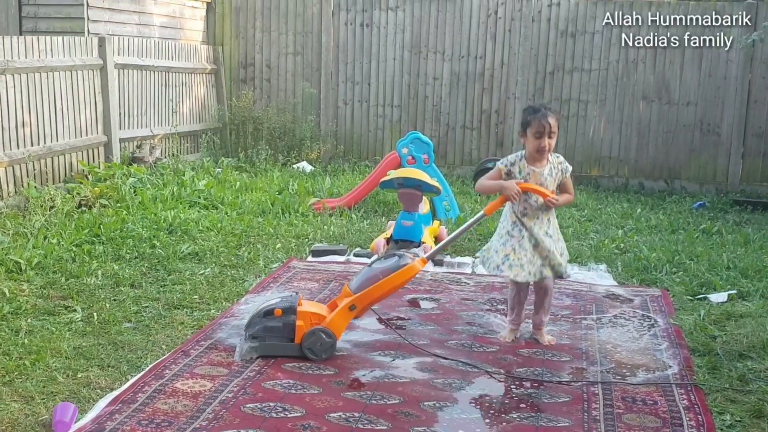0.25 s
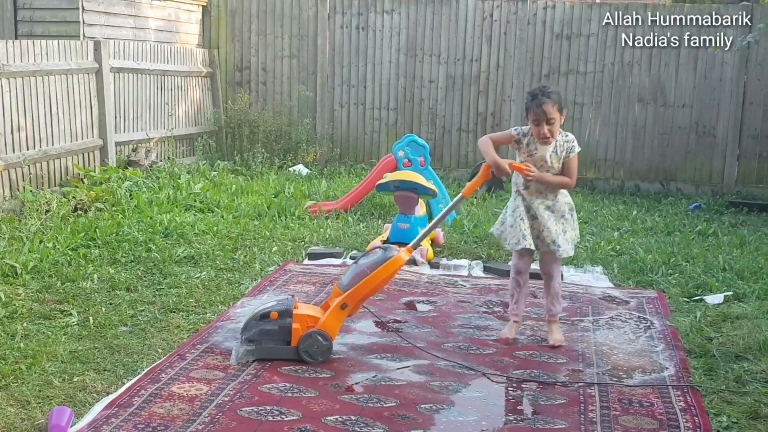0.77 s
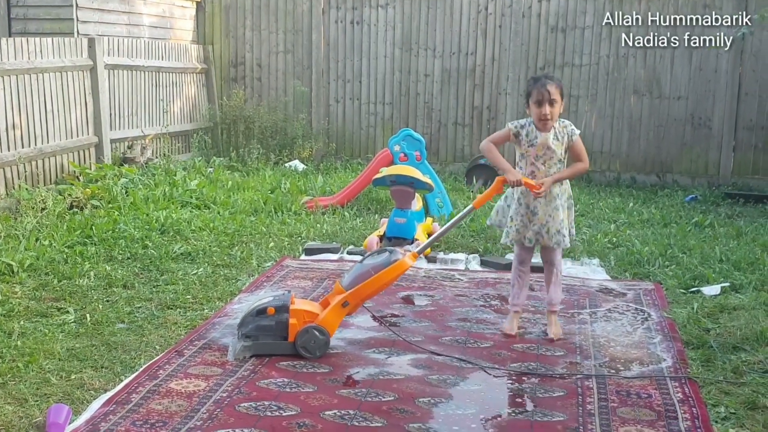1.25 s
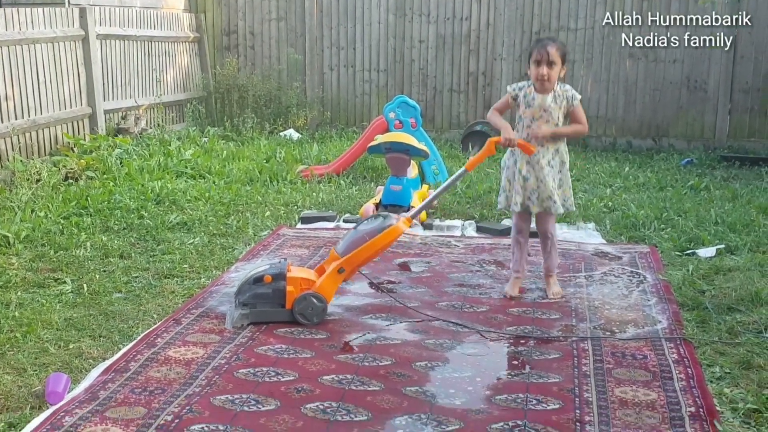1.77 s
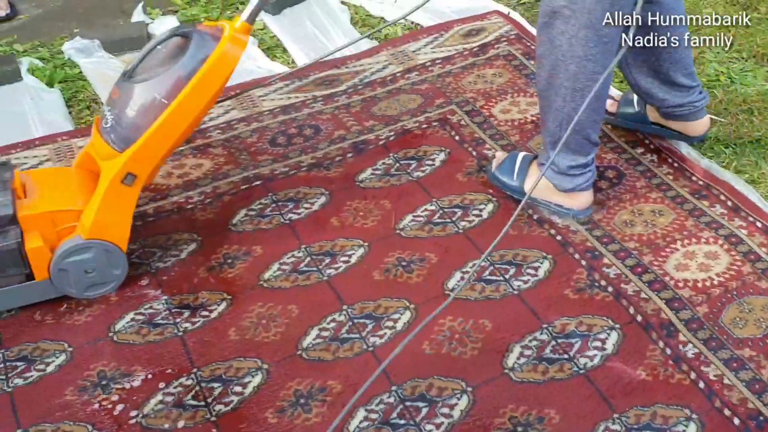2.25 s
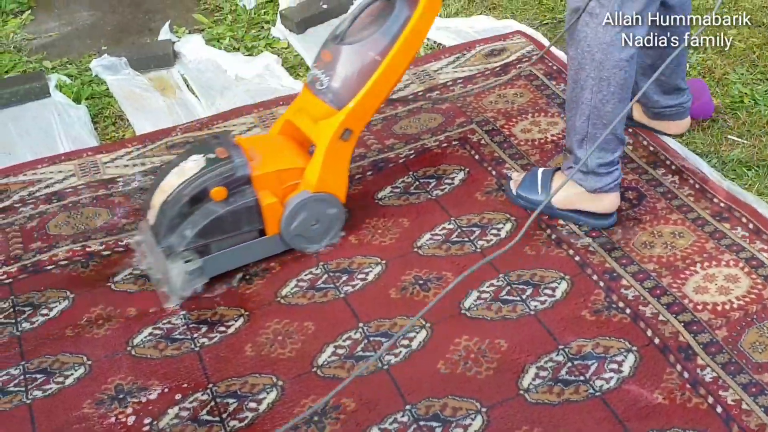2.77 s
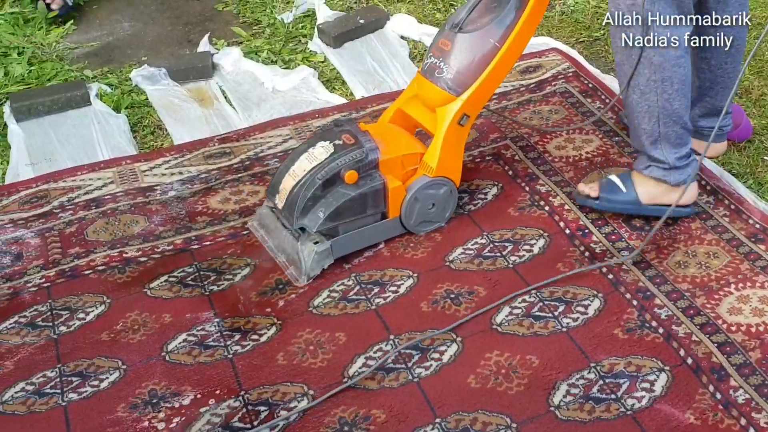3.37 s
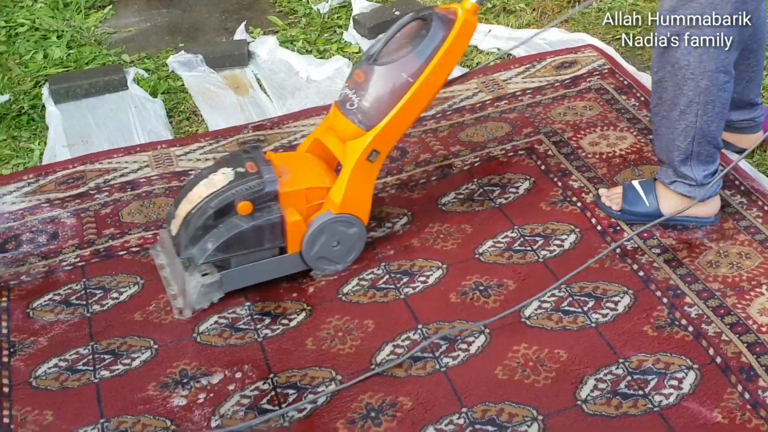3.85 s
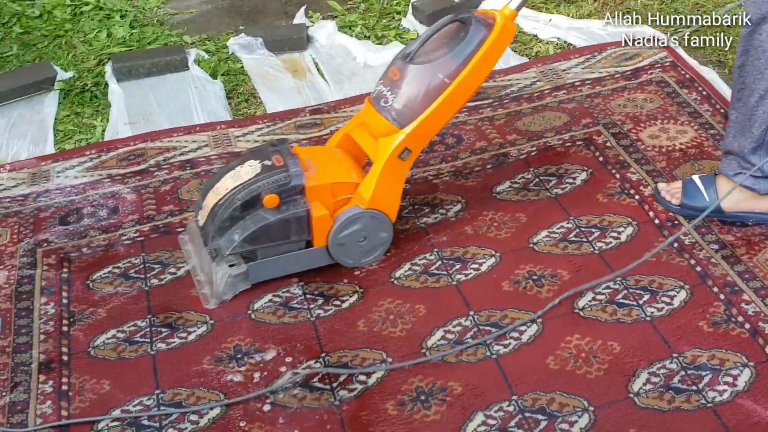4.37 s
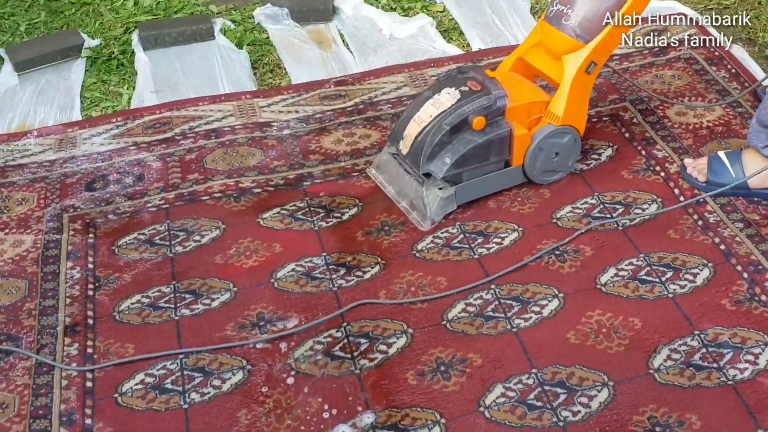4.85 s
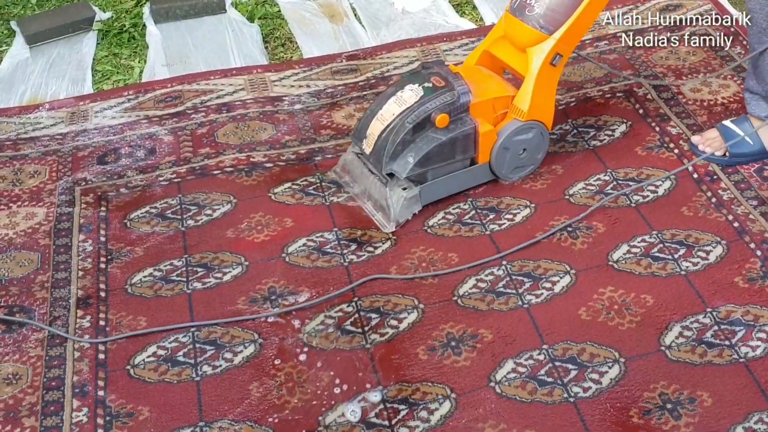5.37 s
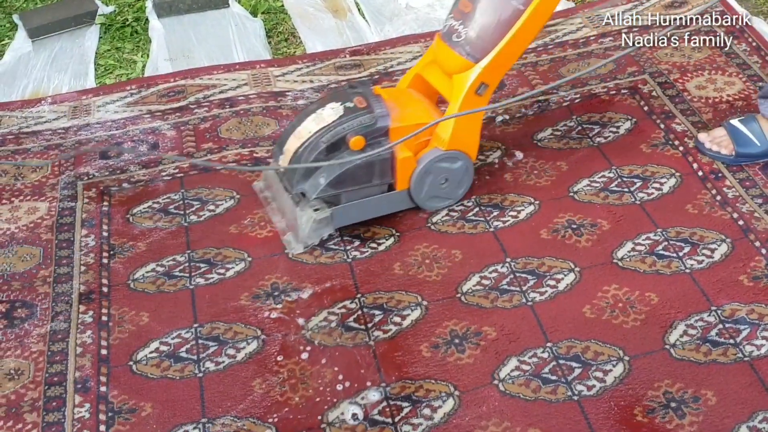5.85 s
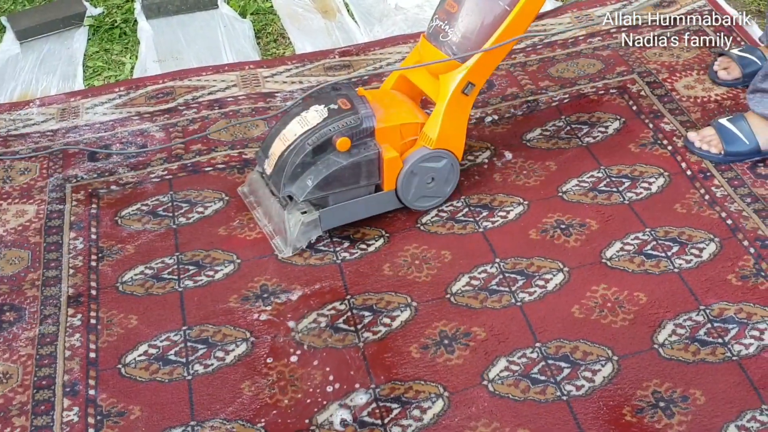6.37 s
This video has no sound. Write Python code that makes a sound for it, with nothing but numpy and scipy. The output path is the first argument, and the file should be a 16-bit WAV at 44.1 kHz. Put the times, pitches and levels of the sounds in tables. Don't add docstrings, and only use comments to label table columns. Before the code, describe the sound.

An upright carpet washer is already running at full speed on a wet rug in a fenced yard, captured in stereo by a phone. From 0 to about 2.6 seconds it is a few metres away: a strong, nearly constant motor tone around 450 hertz, faint higher multiples including a wavering whine near 3 kilohertz, and a broad, slightly hollow suction hiss. At about 2.6 seconds an abrupt cut moves close. The pitch stays almost the same, but the air is louder and the whine more piercing. The hum dips deeply around 3.1 seconds, returns strongly near 3.9, sinks again about 4.9, and recovers by 5.9, shifting a little between the sides. Suction surges with short strokes, notably around 3.2, 3.9 and 4.6 seconds, and slight low wind puffs stir beneath. The machine is still running at 6.6 seconds.

```python
import sys
import numpy as np
from scipy import signal
from scipy.fft import rfft, irfft, next_fast_len
from scipy.io import wavfile
from scipy.ndimage import uniform_filter1d, map_coordinates

SR = 44100
rng = np.random.default_rng(int(sys.argv[2]) if len(sys.argv) > 2 else 0)


def file_out(sig):
    cols = np.atleast_2d(sig).T
    lim = np.clip(cols, -1, 1)
    pcm = np.round(lim * 32767).astype(np.int16)
    wavfile.write(sys.argv[1], SR, pcm)


def attenuation_scalar(level_db):
    decades = np.asarray(level_db, float) / 20
    return 10 ** decades


N = 291942
CUT_S, CUT_TURNS = 2.56667, -0.5
CONTROL_HOP = 32
SHAFT_USUAL_DB = -30
DRIFT_DB, DRIFT_PER_S = 0.5, 8.36
PATCH_OCTAVES = 0.43

# (time [s], speed [turns/s])
SHAFT_SPEED = [(0, 451.2), (.7, 451.0), (1.6, 451.1), (2.2, 451.2), (2.566, 451.1), (2.567, 450.0),
               (3.7, 450.1), (3.95, 450.3), (4.15, 449.9), (4.6, 449.4), (5.05, 450.0), (5.7, 449.9),
               (6.15, 449.4), (6.62, 449.3)]
# (time [s], level [dB], left-right [dB])
SHAFT_LEVEL = [
    [(0, -29, -.3), (.15, -29.5, 0), (.28, -30.5, -1), (.5, -31, 2), (.68, -29.5, -1), (1.14, -31, -2.5),
     (1.72, -29, -2), (2.57, -30.5, -2)],
    [(2.57, -28.5, -1), (2.82, -31, 3), (3.1, -39, 4), (3.26, -36, 4), (3.66, -34, 4.5), (3.88, -27.5, 2),
     (4.35, -28.5, -1.5), (4.56, -28.5, 1.5), (4.69, -29, 7), (4.9, -36.5, 10), (5.08, -32.5, 6),
     (5.32, -31, 7), (5.9, -27.5, 3), (6.62, -29.5, 1)],
]
# (multiple, far [dB], near [dB], share of shaft swing [dB/dB])
STRONG = [(2, -53.5, -54, 0.27), (3, -57, -46.5, 0.46), (5, -63.5, -51.5, -0.5), (6, -61, -52, 0.39),
          (12, -63.5, -62.5, -0.25)]
PORT_LEAN = [(2, .1, -.76, -.08, -.35), (3, -.3, -.7, -.1, -.33), (5, -.15, 0, -.12, -.15),
             (6, -.13, .17, -.24, .05), (12, -.2, -.5, -.05, .1)]
# (multiple, far [dB], near [dB])
WEAK = [(4, -57, -61), (8, -66, -61.5), (9, -71, -64.5), (10, -75, -74), (11, -75, -77), (13, -70, -70),
        (14, -67, -72), (15, -78, -76), (16, -77, -75), (18, -80, -84), (20, -80, -84), (22, -79, -74),
        (23, -79, -76), (24, -75.5, -78), (28, -85, -86)]
# (time [s], multiple, length [s], level [dB])
ALIGNED = [(1.4, 2, 0.27, 2), (1.73, 2, 0.12, -16), (2.32, 2, 0.46, -6), (2.73, 2, 0.29, 9.5),
           (3.46, 2, 0.14, -11), (3.87, 2, 0.14, 6.5), (5.3, 2, 0.2, 6), (5.26, 2, 0.4, -4),
           (.05, 3, .2, -5), (1.48, 3, 0.14, 4.5), (3.24, 3, 0.25, -8.5), (3.7, 3, 0.45, 1.5),
           (4.6, 3, 0.67, -5.5), (5.6, 3, 0.042, 7), (2.63, 5, 0.18, -18), (4.1, 5, 0.1, 2),
           (5.4, 5, 0.13, 3), (5.9, 5, 0.17, 3.5), (0.73, 6, 0.84, 5), (4.3, 6, 0.29, 5),
           (5.45, 6, 0.59, -11), (6.55, 6, 0.55, 5.5), (1.67, 12, 0.24, -8), (2.7, 12, 0.16, -12),
           (2.25, 12, 0.08, 5.5), (2.7, 12, 0.12, 3), (3.59, 12, 0.052, 12), (3.7, 12, .12, -2),
           (5.24, 12, 0.18, -16), (5.6, 12, 0.045, 9), (4.2, 2, 0.14, -6), (4.1, 2, 0.37, 2.5),
           (6.45, 2, 0.29, 2.5), (2.62, 3, 0.41, -3), (6.55, 5, .2, 2.5), (2.6, 6, .12, -6),
           (5.95, 6, .25, -1.5), (5.1, 6, 0.13, -9), (1.9, 4, 0.28, -0.5), (3.95, 4, .12, 11),
           (2.0, 8, .5, -6), (6.1, 8, 0.41, -1), (1.33, 3, 0.066, -8), (2.6, 3, .2, 0.5), (2.6, 3, .08, 2),
           (1.94, 12, 0.25, 5), (4.35, 12, .06, 8)]
# (time [s], multiple, length [s], level [dB])
FLICKERS = [(5.2, 12, .06, 7), (2.7, 12, .1, 6.5), (6.45, 12, .14, -6), (6.12, 12, .1, 4),
            (.03, 12, .2, -6), (2.92, 12, 0.074, 3), (1.28, 12, .15, 4), (6.55, 3, .08, -6),
            (4.88, 2, 0.076, -10), (5.14, 2, .05, -8), (2.37, 2, .05, -8), (6.58, 2, .1, 4),
            (3.2, 2, .08, 3), (3.2, 2, .1, -6), (0.12, 2, 0.28, 2), (3.6, 5, .08, 5), (4.3, 5, .15, -3),
            (4.8, 5, .07, 4), (3.66, 5, 0.055, -8), (4.9, 5, .05, -6), (4.9, 5, .3, 1.5)]
# (far [dB], near [dB])
BLADE_MID_DB = [-56.5, -51.5]
BLADE_SIDE_DB = [-52.5, -52]
# (time [s], length [s], mid peak [dB], side peak [dB])
BLADE_SWELLS = [(0.547, 0.16, -76, -48), (1.288, 0.07, -56, -70), (1.27, .25, -66, -51), (.9, .2, -77, -60),
                (1.554, .2, -64, -50), (1.774, 0.22, -49, -64), (1.994, 0.091, -57, -51),
                (2.215, 0.27, -46.5, -55), (2.453, 0.33, -47.5, -49), (2.556, .04, -50, -48),
                (2.593, 0.04, -47, -31), (2.64, .07, -80, -41), (2.69, 0.037, -48, -57),
                (2.805, 0.09, -49, -62), (0.048, .08, -62, -60), (.22, 0.065, -54, -75),
                (.38, .08, -57, -60), (0.51, .1, -57, -58), (.83, 0.089, -63, -62), (3.752, .05, -54, -60),
                (3.872, 0.064, -55, -55), (6.3, 0.17, -53, -64), (2.916, 0.07, -40, -35),
                (3.37, .08, -80, -50), (3.63, .08, -80, -48), (3.95, .08, -80, -48), (5.22, .1, -77, -47),
                (4.92, .25, -77, -56), (3.016, 0.1, -37.5, -49), (3.153, 0.15, -49, -41),
                (3.474, 0.33, -39.5, -62), (4.084, 0.13, -71, -42), (4.285, 0.14, -61, -48),
                (4.558, 0.11, -42.5, -54), (4.74, 0.12, -40, -47), (4.9, 0.44, -40.5, -56),
                (5.475, 0.3, -36.5, -48), (5.652, 0.22, -50.5, -41.5), (5.88, 0.17, -46, -64),
                (6.09, 0.4, -40.5, -62), (6.598, 0.46, -38.5, -58)]
# (time [s], length [s], level [dB])
BLADE_GAPS = [
    (2.575, 0.012, -18),
    (2.64, .025, -12),
    (2.72, .04, -5),
    (.74, .06, -10),
    (3.8, .03, -7),
    (4.4, .04, 4),
    (.32, .07, -4),
    (0.082, .05, -3),
    (3.27, .05, -4),
    (3.11, .05, -3),
]
# (far [dB], near [dB])
AIR_DB = [-42, -39]
# (far [dB], near [dB])
AIR_PAN_DB = [-2.1, -2]
AIR_LAYER_HZ = [1100, 1800, 4200, 8000]
AIR_FOLLOWS_SHAFT = [0.39, 0.002, -0.094, -0.063]
AIR_FOLLOWS_SUCTION = [.05, 0.23, 0.24, 0.47]
# (time [s], suction [dB])
SUCTION = [
    [(0, -2.5), (.25, 2), (.55, 0), (.9, -1.5), (1.6, -1.5), (2.25, -2.5), (2.57, 0)],
    [(2.57, 6), (2.65, 2), (2.8, -2.5), (3.0, 1.5), (3.2, 5.5), (3.6, 0.5), (3.9, 5), (4.3, 1.5),
     (4.55, 6.5), (4.7, 6.5), (4.8, 3), (5.3, 1.5), (5.65, 1), (5.78, 0.5), (5.9, 4.5), (6.15, 3),
     (6.3, 3.5), (6.62, 2.5)],
]
# (frequency [Hz], density [dB])
FAR_COLOUR = [(20, -20), (100, -11.5), (230, -1.5), (420, 0), (590, -2), (900, -3.5), (1250, -11.5),
              (2000, -4), (3000, -9.5), (4800, -11.5), (9500, -16.5), (11500, -29), (13500, -28.5),
              (15500, -43)]
NEAR_COLOUR = [(20, -30), (100, -19), (200, -7), (320, 1.5), (600, -2), (1050, -6.5), (1250, -3.5),
               (1850, -1), (3000, -5.5), (4200, -10), (5300, -17.5), (9000, -18), (10600, -24.5),
               (11400, -34), (15500, -46.5)]
# (frequency [Hz], width [Hz], level [dB])
FAR_DUCTS = [(236, 20, -3.5), (303.5, 38, 9.5), (593, 41, -5), (3020, 130, -7.5), (1040, 210, 6.5),
             (1640, 180, 8), (1915, 57, 10), (2216, 88, 7), (2580, 230, 13), (4340, 150, 7.5),
             (7550, 180, 5.5), (3265, 470, 9.5), (1240, 110, -5), (6090, 60, 2), (11800, 200, 8),
             (13700, 600, -5), (4020, 68, 5), (4750, 150, -2), (1390, 40, -3)]
NEAR_DUCTS = [(1830, 120, -8.5), (3070, 170, -3), (477, 92, -7.5), (1308, 45, 9), (1452, 145, 5.5),
              (1624, 69, 4.5), (2090, 330, 2.5), (2540, 230, 5), (6050, 145, 9.5), (7520, 140, 3.5),
              (11600, 500, -2.5), (12000, 130, 6), (13150, 200, 2), (13650, 450, -2), (385, 42, -3),
              (5740, 120, -1), (4040, 120, 3.5), (3520, 92, 1.5)]
# (frequency [Hz], level re direct air [dB])
FAR_SCATTER = [(40, -6), (110, -7), (250, -16), (600, -8), (1050, 0.5), (1280, 9.5), (1600, 1),
               (2400, -6.5), (3000, -4), (4200, -6.5), (7000, -1.5), (9200, 4.5), (12500, 5.5), (15000, 12)]
NEAR_SCATTER = [(40, -14), (110, -17), (250, -14), (600, -9), (1050, -2), (1500, -4.5), (3000, -3),
                (4200, -1.5), (5500, -0.5), (8500, 0.5), (15000, 16.5)]
# (delay [ms], share [ratio])
FAR_PORTS = [(.19, -0.2), (.55, -0.18), (1.15, -0.12)]
NEAR_PORTS = [(0.181, -0.55), (.62, 0.14)]
# (time [s], left port delay [ms])
LEFT_LATE = [(0, -.04), (2.56, -.05), (2.58, -.09), (3.1, .01), (3.7, 0), (4.1, -.06), (4.5, 0), (4.9, .05),
             (5.5, .02), (6.62, 0)]
# (time [s], length [s], level [dB])
TOP_SWELLS = [
    (2.7, .3, 2),
    (3.02, .1, -3),
    (3.36, .08, -2),
    (4.1, 0.32, 3),
    (4.35, .17, 5),
    (5.5, .3, -1),
    (6.0, 0.16, 3),
]
# (time [s], length [s], level [dB])
BREEZE = [
    (.36, .1, 14),
    (1.9, .15, -5),
    (2.35, .2, -5),
    (3.104, .2, 9),
    (3.5, .08, 4),
    (3.9, .15, 7),
    (4.4, .2, 8),
    (5.1, .1, -1),
    (6.6, .12, 9),
]
# (time [s], length [s], frequency [Hz], level [dB])
AIR_PATCHES = [(1.65, 0.48, 940, -4), (2.7, 0.32, 1000, 4.5), (3.04, .25, 1200, -2), (4.2, .7, 1150, 2.5),
               (5.5, .8, 1120, -3), (6.1, .5, 1100, 2), (3.85, .25, 2000, -1), (6.45, .4, 2300, 3.5),
               (2.62, 0.21, 2200, -6), (3, 0.28, 2600, -2), (5.85, 0.49, 2500, 3.5), (1.05, .3, 4500, 3.5),
               (2.75, 0.35, 3600, -6.5), (4.07, .5, 4300, -3), (5.05, 0.55, 4100, 2.5),
               (4.9, .5, 6500, -2.5), (2.72, .3, 9600, 4), (3.85, 0.28, 9000, -4.5), (4.54, .4, 9000, -3.5),
               (5.0, .35, 5650, 0), (5.06, .3, 6600, -0.5), (3.23, .3, 8100, 0.5), (2.9, 0.36, 5600, -1),
               (5.36, .45, 7900, -1.5), (3, .3, 9000, -1), (6.3, .15, 4600, -1), (2.2, .25, 530, -6),
               (3.15, 0.39, 740, 4), (3.66, .25, 890, -1), (3.9, .7, 2100, -1), (5.6, 0.25, 2000, -1),
               (6.6, .7, 4030, 1)]


def on_log(hz, points):
    at_hz, value = np.transpose(points)
    return np.interp(np.log(hz), np.log(at_hz), value)


def columns(table, t):
    at_s, *rest = np.transpose(table)
    return [np.interp(t, at_s, column) for column in rest]


def walk(rate_hz, slow):
    hold = max(int(SR / CONTROL_HOP / rate_hz), 1)
    held = np.repeat(rng.standard_normal(len(slow) // hold + 1), hold)
    return 1.62 * uniform_filter1d(uniform_filter1d(held, hold), hold)[:len(slow)]


def bump(x, centre, length):
    return np.exp(-4 * ((x - centre) / length) ** 2)


def events_db(t, events):
    return sum(db * bump(t, at_s, length_s) for at_s, length_s, db in events)


def multiple_db(t, multiple, table):
    return events_db(t, [(at_s, length_s, db) for at_s, of, length_s, db in table if of == multiple])


def random_turn():
    return 2 * np.pi * rng.random()


def flutter(slow, spread_db, slip_rad=.25):
    level = attenuation_scalar(spread_db * walk(35, slow) + 1.17 * walk(140, slow))
    return level * np.exp(1j * (slip_rad * walk(15, slow) + random_turn()))


def to_ports(t, angle, mid, side):
    ports = np.array([np.interp(t, t[::CONTROL_HOP], mid + sign * side) for sign in (1, -1)])
    return np.imag(ports * np.exp(1j * angle))


def fan(t, view, turns):
    slow = t[::CONTROL_HOP]
    speed, = columns(SHAFT_SPEED, t)
    angle = 2 * np.pi * (turns + np.cumsum(speed) / SR)

    shaft_db, pan_db = columns(SHAFT_LEVEL[view], slow)
    swing_db = shaft_db - SHAFT_USUAL_DB
    shaft = attenuation_scalar(shaft_db + .06 * walk(30, slow) + .08 * walk(8, slow))
    lead = (.16, -.065 * (np.max(shaft_db) - shaft_db))[view]
    out = to_ports(t, angle, shaft, shaft * (np.tanh(0.04 * pan_db) + 1j * lead))

    turning = (1, .3 + .35 * (slow - CUT_S))[view]
    for (k, *usual_db, share), (_, *lean) in zip(STRONG, PORT_LEAN):
        db = usual_db[view] + share * swing_db + DRIFT_DB * walk(DRIFT_PER_S, slow)
        db = db + multiple_db(slow, k, ALIGNED) + multiple_db(slow, k, FLICKERS)
        mid = attenuation_scalar(db) * (flutter(slow, 1.9, .7) if k == 12 else flutter(slow, 1.2))
        apart = mid * attenuation_scalar(-.6 * (db - usual_db[view]))
        balance, left_lead = lean[2 * view:2 * view + 2]
        left_lead = turning * left_lead + .045 * k * walk(3, slow)
        out += to_ports(t, k * angle, mid, apart * (balance + 1j * left_lead))

    out += blade(t, view, angle)

    for k, *usual_db in WEAK:
        mid = attenuation_scalar(usual_db[view] - .5 + 1.1 * walk(7, slow) + 2.2 * walk(30, slow))
        mid = mid * attenuation_scalar(multiple_db(slow, k, ALIGNED))
        mid = mid * np.exp(1j * (.6 * walk(20, slow) + random_turn()))
        side = mid * (0.39 * walk(4, slow) + .45j * walk(4.36, slow))
        out += to_ports(t, k * angle, mid, side)
    return np.sqrt(2) * out, angle


def blade(t, view, angle):
    slow = t[::CONTROL_HOP]
    mid, side = attenuation_scalar(BLADE_MID_DB[view]), attenuation_scalar(BLADE_SIDE_DB[view])
    for at_s, length_s, mid_db, side_db in BLADE_SWELLS:
        if (at_s > CUT_S) == view:
            swell = bump(slow, at_s, length_s)
            mid = mid + attenuation_scalar(mid_db) * swell
            side = side + attenuation_scalar(side_db) * swell
    waver = attenuation_scalar(events_db(slow, BLADE_GAPS)) * flutter(slow, .4, .16)
    slip_rad = (-.4 * slow, -.2)[view] + .5 * walk(3, slow)
    return to_ports(t, 7 * angle, mid * waver, -side * np.exp(1j * slip_rad) * waver)


def air(t, view, colour, ducts, scatter, ports, angle):
    size, slow = next_fast_len(len(t)), t[::CONTROL_HOP]
    hz = np.maximum(np.fft.rfftfreq(size, 1 / SR), 1)
    octave = np.log2(hz)
    colour_db = on_log(hz, colour)
    for at_hz, width_hz, top_db in ducts:
        colour_db = colour_db + top_db / (1 + (2 * (hz - at_hz) / width_hz) ** 2)
    direct, *scattered = rfft(rng.standard_normal((3, size))) * attenuation_scalar(colour_db)

    bent = sum(share * np.exp(-2j * np.pi * hz * late_ms / 1000) for late_ms, share in ports)
    bent = bent / (1 + (900 / hz) ** 2)
    both = direct * np.array([np.ones_like(bent), 1 + bent])
    both = both + attenuation_scalar(on_log(hz, scatter)) * np.array(scattered)

    shaft_db, _ = columns(SHAFT_LEVEL[view], slow)
    suction_db, = columns(SUCTION[view], slow)
    swell_db = np.outer(AIR_FOLLOWS_SHAFT, shaft_db) + np.outer(AIR_FOLLOWS_SUCTION, suction_db)
    swell_db = swell_db - np.mean(swell_db, axis=1, keepdims=True)
    pan_db = AIR_PAN_DB[view] + 0.47 * walk(4.65, slow)
    breeze_db, top_db = events_db(slow, BREEZE), events_db(slow, TOP_SWELLS)
    gust = walk(35, slow)

    out = 0
    for centre in np.arange(13 / 3, 14.3, 1 / 3):
        layer = np.interp(centre, np.log2(AIR_LAYER_HZ), np.arange(4))
        low = min(int(layer), 2)
        band_db = swell_db[low] + (layer - low) * (swell_db[low + 1] - swell_db[low])
        band_db *= np.clip((centre - 7.5) / 2.8, .15, 1)
        band_db *= np.clip((14.2 - centre) / 1.1, .3, 1)
        if centre > 13.4:
            band_db += top_db
        for at_s, length_s, at_hz, db in AIR_PATCHES:
            band_db += db * bump(slow, at_s, length_s) * bump(centre, np.log2(at_hz), PATCH_OCTAVES)
        flicker_db = 0.79 * walk(18, slow) if centre < 12 else 0.96 * walk(40, slow)
        band_db += 0.31 * gust + flicker_db + 0.1 * walk(2.3, slow)
        band_db += (1.5 * walk(6, slow) + breeze_db) * np.clip(7.4 - centre, 0, 1)
        tilt_db = np.clip((centre - 8) / 4.5, 0, 1) * (1.57 * pan_db + 1.5) / 2
        gain = [np.interp(t, slow, attenuation_scalar(band_db + sign * tilt_db)) for sign in (1, -1)]
        band = np.clip(1 - 3 * abs(octave - centre), 0, 1)
        out = out + gain * irfft(both * band, size)[:, :len(t)]

    out *= attenuation_scalar(AIR_DB[view]) / np.std(out) * (1 + .04 * np.cos(angle))
    late_ms, = columns(LEFT_LATE, t)
    heard_at = np.arange(len(t)) - late_ms * SR / 1000
    out[0] = map_coordinates(out[0], [heard_at], order=3, mode="mirror")
    return out


def scene():
    cut, t = int(CUT_S * SR), np.arange(N) / SR
    far = (t[:cut], FAR_COLOUR, FAR_DUCTS, FAR_SCATTER, FAR_PORTS)
    near = (t[cut:], NEAR_COLOUR, NEAR_DUCTS, NEAR_SCATTER, NEAR_PORTS)
    views, turns = [], 0
    for view, (span, *colouring) in enumerate([far, near]):
        tones, angle = fan(span, view, turns)
        views.append(tones + air(span, view, *colouring, angle))
        turns = angle[-1] / (2 * np.pi) + CUT_TURNS
    return np.concatenate(views, axis=1) * (1 - .3 * bump(t, CUT_S, .0004))


def roll_off(x):
    return signal.sosfilt(signal.butter(12, 15480, fs=SR, output="sos"), x)


def record(dry):
    return roll_off(dry)


dry = scene()
out = record(dry)
file_out(out)
```